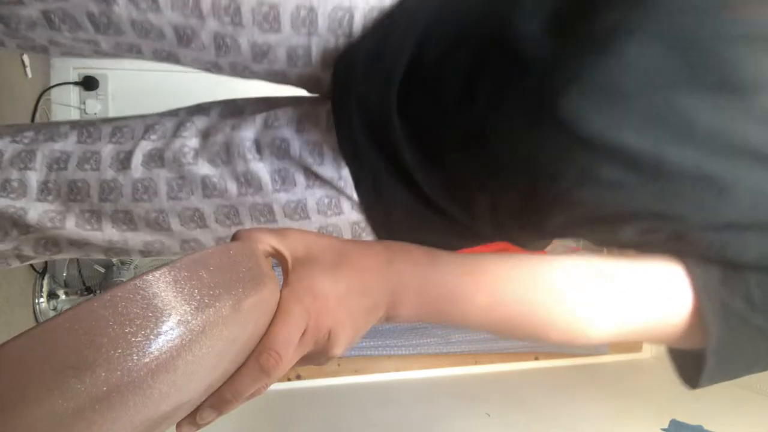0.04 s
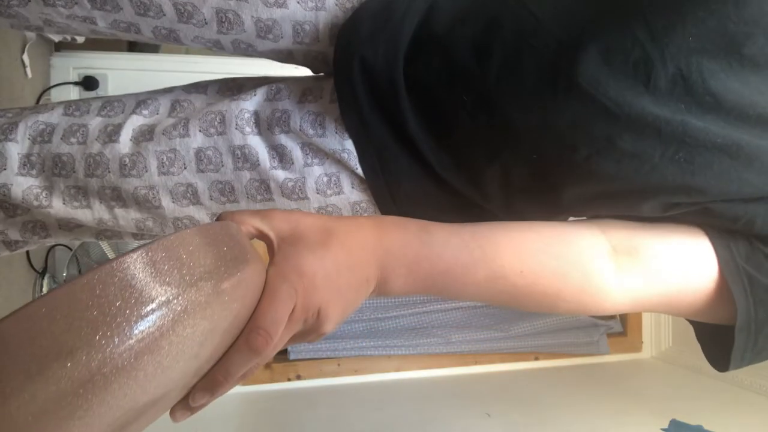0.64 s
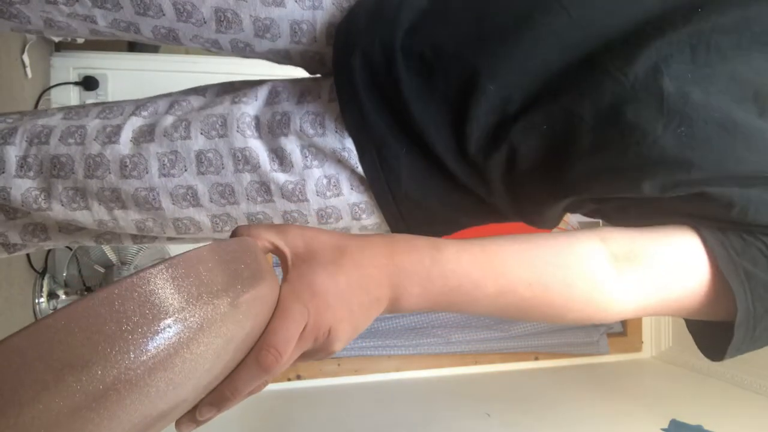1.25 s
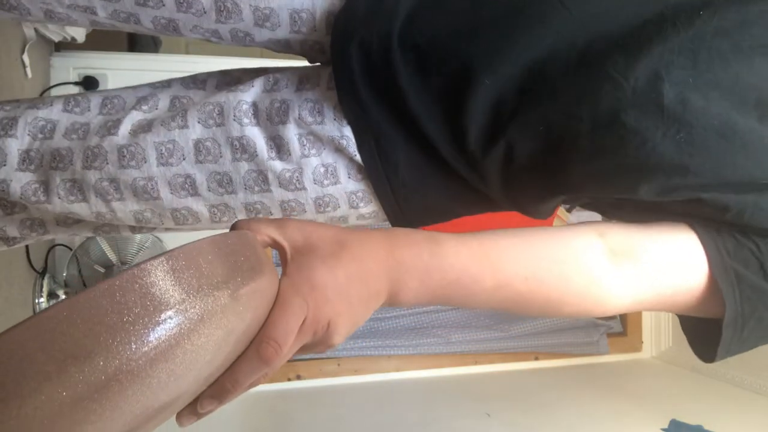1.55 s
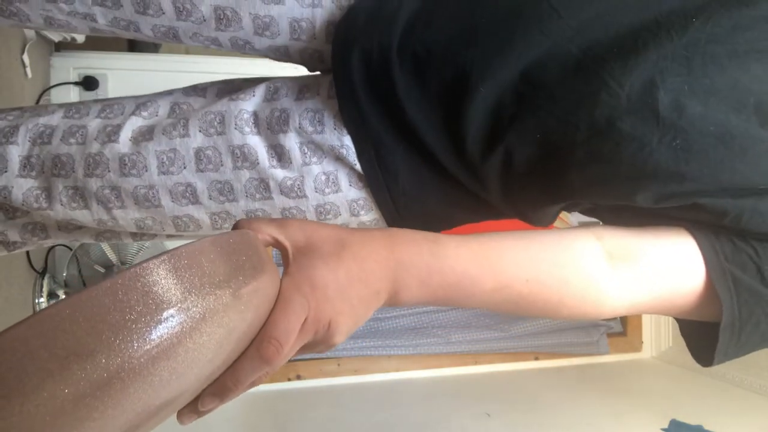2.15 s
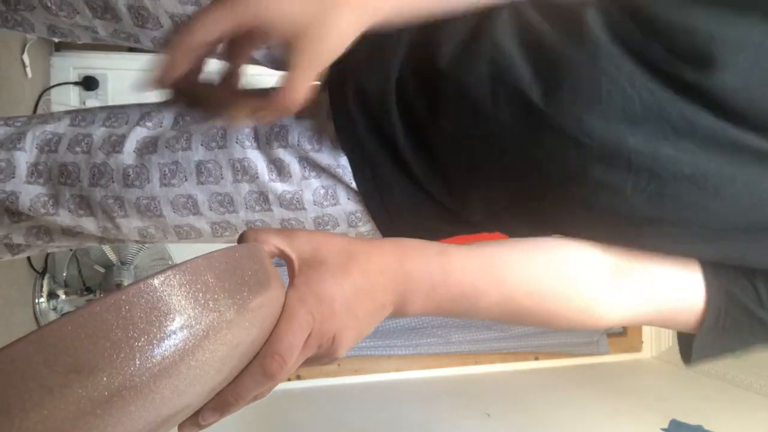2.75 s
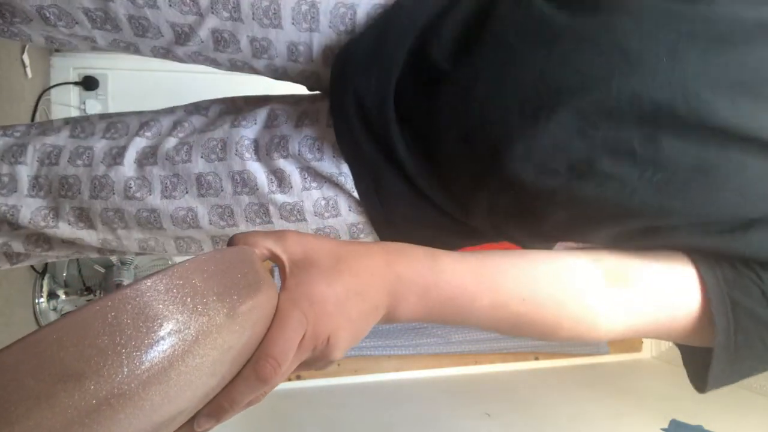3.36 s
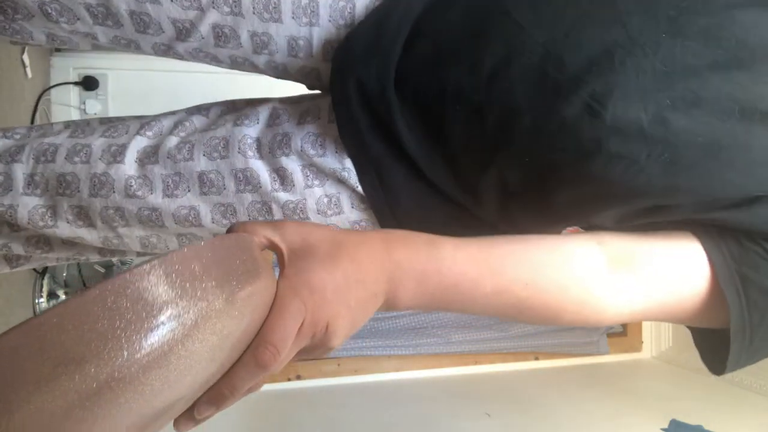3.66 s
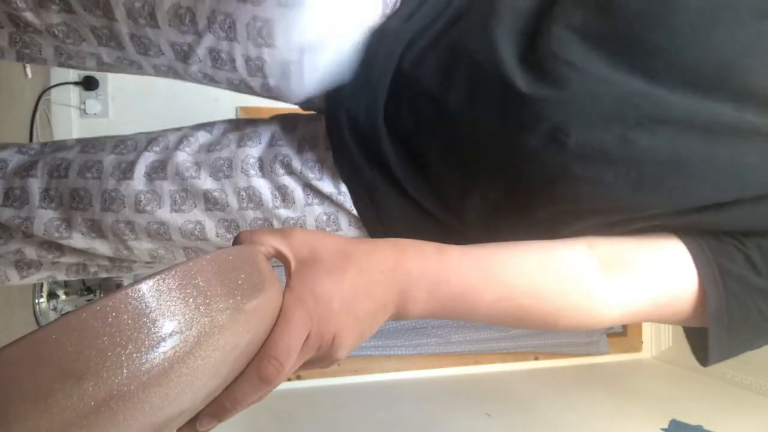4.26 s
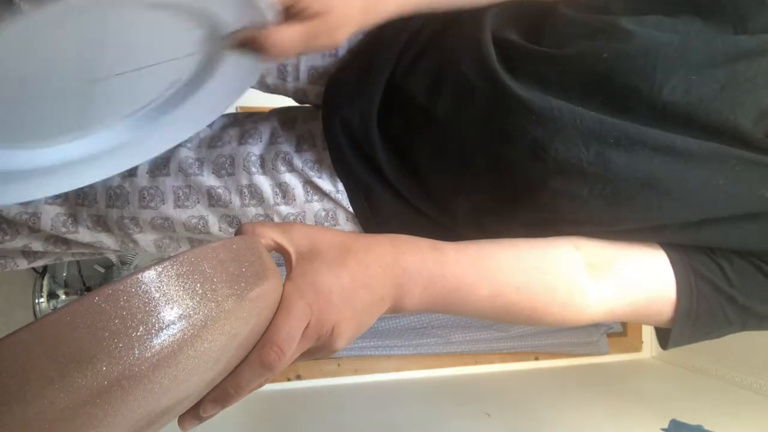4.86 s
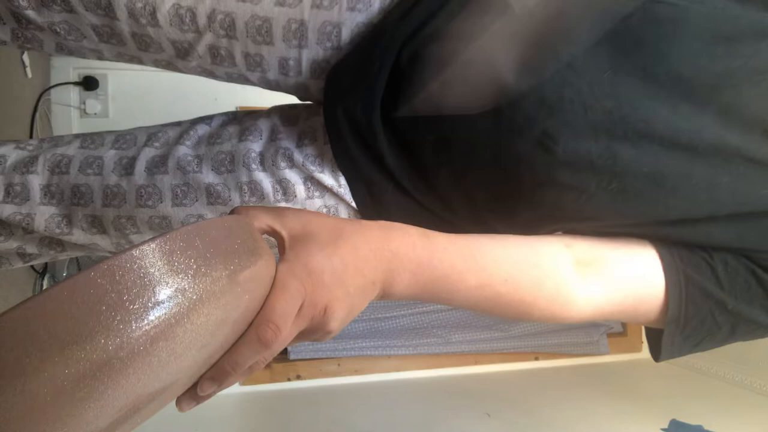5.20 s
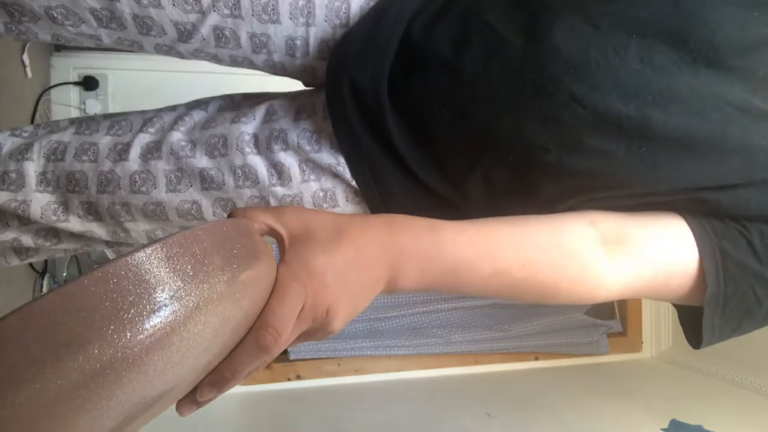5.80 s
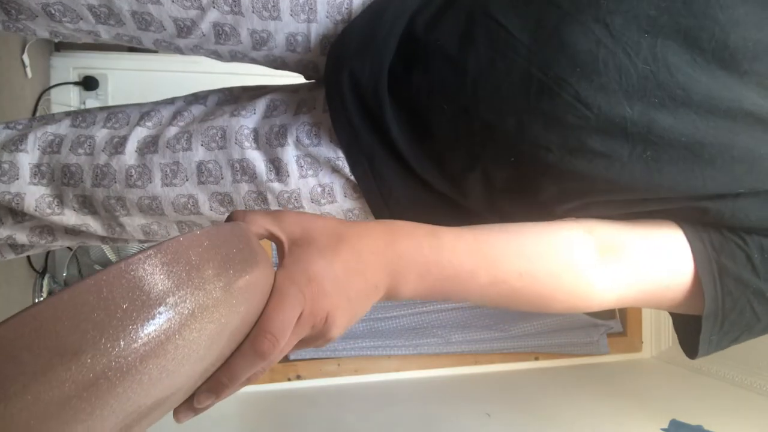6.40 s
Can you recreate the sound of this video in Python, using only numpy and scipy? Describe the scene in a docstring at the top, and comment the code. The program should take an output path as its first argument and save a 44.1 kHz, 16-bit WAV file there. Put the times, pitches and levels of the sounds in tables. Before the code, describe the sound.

Metal knocks with one long ringing clang, followed by handling taps, a dragging scrape and a plastic piece clattering onto metal.

```python
"""Handling a metal fan in a small bedroom

A metal part knocks down four times and is left ringing on one long note with a beating overtone.
Small parts tap, something is dragged with a rough catch-and-slip scrape, and a hollow plastic piece
ticks as it is picked up, then clatters down onto the metal. Each hit is a sharp pulse plus the ring
of the thing struck. Hits and friction get a short room tail; quiet air lies under it all."""
import sys
import numpy as np
from scipy import signal
from scipy.fft import rfft, irfft, next_fast_len
from scipy.io import wavfile

SR = 44100
rng = np.random.default_rng(int(sys.argv[2]) if len(sys.argv) > 2 else 0)


def wav_out(sig):
    """Save sig, one row per channel (or a flat mono array), as 16-bit PCM at SR to the path in sys.argv[1]."""
    wavfile.write(sys.argv[1], SR, np.round(np.clip(np.atleast_2d(sig).T, -1, 1) * 32767).astype(np.int16))


N = 288414
TIME = np.arange(N) / SR
HIT_SAMPLES = 16384

# Levels and gains in the tables are relative: each layer is trimmed again in its function.
# room tone: freq_hz, level_db
AIR_SPECTRUM = [(18, -53), (30, -20.5), (64, -1.5), (221, -3.5), (245, -3), (461, -3.5), (540, -3.5),
                (844, -9), (937, -7), (1540, -10.5), (2120, -16.5), (6550, -21.5), (16000, -32.5)]
# the room's tail, longest in the bass: freq_hz, t60_s
ROOM_DECAY = [(100, 0.9), (400, 0.23), (1500, .2), (5000, 0.14), (14000, .13)]
# the room's standing waves: pitch_hz, width_hz, gain_db
STANDING_WAVES = [(70.4, 2, 3.5), (127, 8, -3.5), (162.8, 6.8, 8.5), (264, 7, 0), (300, 10, 0.5),
                  (373, 3, 4), (603, 24, 0.5)]

# the drag (a hard tug, a light slide, three catches, a long push, settling):
# full_pressure_s, swell_s, hold_s, fade_s, level_db, brightness_db_per_band, rumble_db
DRAG_STROKES = [(2.972, 0.0085, 0.041, 0.24, -33.5, -2.24, 2), (3.05, 0.054, 0.33, .05, -54, -3, 2),
                (3.26, .015, 0.033, 0.015, -36, -7, -11), (3.465, 0.075, 0.01, 0.19, -49, 0.5, 5),
                (3.585, 0.0068, 0.019, 0.093, -32, -9.5, -2),
                (3.735, 0.43, 0.12, 0.055, -34.5, -7.5, -10.5), (3.98, 0.11, 0.031, 0.048, -61, -3, 8.5)]
# smoother rubs, mostly sliding into a hit or rocking after it: same columns
RUB_STROKES = [(0.525, 0.021, .02, .035, -28, -14.5, -3), (0.6, 0.036, 0.14, 0.039, -46, -15.5, -3),
               (0.732, .012, 0.0057, .004, -27, -18.5, -3), (1.15, .3, 0.033, 0.28, -59, -3, 7),
               (2.0, .05, 0.18, 0.62, -70, -3.5, -9), (5.945, .25, 0.0069, .02, -63, -1.5, -7),
               (6.14, 0.011, 0.011, 0.05, -36.5, -9.5, -8), (6.24, 0.093, 0.039, .02, -58, 0, -7),
               (6.297, 0.0076, 0.0089, 0.0035, -26, -10, -17), (6.39, 0.036, .15, .05, -42, -15.5, -18)]
# colour of the friction: freq_hz, level_db
FRICTION_SPECTRUM = [(29, -50.5), (50, -18.5), (138, -13), (180, -2.5), (306, 1), (380, -6), (520, 2),
                     (1330, -11), (1910, -9), (2680, -17.5), (3250, -17.5), (5270, -28), (7570, -26.5),
                     (16000, -46)]
# borders of its rumble, low, mid and high bands: edge_hz
FRICTION_EDGES = [30, 380, 1100, 4200, 17000]
# resonances of the dragged piece: pitch_hz, width_hz, gain_db
DRAG_MODES = [(1430, 40, -3.5), (1680, 40, -2), (1920, 110, 0), (2265, 170, -10), (3180, 170, -13),
              (3470, 69, -12), (4170, 94, -16), (6130, 320, -18)]

# Hit cues, tilted from heavy thud to light rap: start_s, level_db, tilt_db_per_octave, snap_db
TAP_HITS = [(1.201, -48, 0.5, -22), (1.265, -39, -4, -5.5), (1.316, -34, -1, -28.5), (1.41, -64.5, -2, 7),
            (1.491, -41.5, -2, -30), (1.728, -34, -2, -28.5), (1.754, -29, 0.5, -22.5),
            (1.764, -30, 0.5, -24), (1.818, -35, -4.5, -27), (1.875, -54.5, 5, -7.5),
            (2.969, -41, 4.5, 6.5), (3.0, -29, 3, -4.5), (3.013, -38.5, -10, -25), (3.26, -39, 3.5, -16),
            (3.365, -43, 5, -6), (3.461, -41.5, -6.5, -23), (3.581, -34.5, -6, -10), (3.635, -29, 1, -42),
            (3.735, -31, 0.5, -19), (3.862, -35, -2, -34), (4.059, -61, -10, 1), (5.091, -55.5, -7, -13),
            (5.588, -56.5, -4, -3)]  # light bumps while handling
TICK_HITS = [(4.194, -53.5, 1.9, -10), (4.712, -53.5, 6.4, -4), (4.86, -65.5, 2, -3)]  # the plastic piece picked up
CLATTER_HITS = [(5.9598, -20, -1, -16), (5.9922, -23.5, 0.5, -10), (6.012, -35, -2, -7),
                (6.0498, -27, -2, -32), (6.106, -36.5, 3.5, -12), (6.119, -35, -2.5, -15),
                (6.3064, -16.5, 1.3, -12.5), (6.411, -38, -4, -30), (6.5005, -46, 4.5, -22.5)]  # the plastic piece dropping and rocking
KNOCK_HITS = [(0.4988, -15.5, -4, -30), (0.7372, -17.5, 0, -35), (0.787, -18.5, 3.5, -33),
              (0.8178, -19, -0.7, -29)]  # the metal part set down
# bass, mid, bright and snap points of a hit's tone curve: freq_hz
TONE_POINTS = [260, 900, 2300, 6500]
# What each kind of hit radiates: freq_hz, gain_db
TAP_SPECTRUM = [(30, 1.1), (90, 37.2), (200, 33.7), (450, 45.6), (1100, 38.4), (1900, 41.6), (3000, 34.7),
                (7000, 32.5), (15000, 10.7)]
CLATTER_SPECTRUM = [(30, 5), (75, 31), (200, 28), (320, 44), (850, 41.6), (1250, 34.7), (1800, 39.5),
                    (2900, 32.9), (4500, 35.2), (8500, 31.6), (15000, 14)]
KNOCK_SPECTRUM = [(30, -2.5), (75, 30), (200, 34), (300, 42), (500, 42), (1000, 46), (2000, 40), (3000, 33),
                  (4200, 31), (7000, 28.5), (15000, 14.5)]
# Resonances the hits excite: pitch_hz, width_hz, gain_db
HOLLOW_PLASTIC_MODES = [(850.7, 11, 7), (964, 18, 0.5), (1664, 92, 4.5), (1930, 56, 7), (2113, 1.6, 10.5),
                        (2430, 22, 3), (2473, 8.3, 0.5), (3544, 75, 6.5), (4220, 30, -14), (4883, 56, 4),
                        (7380, 230, -1)]
HELD_PLASTIC_MODES = [(1110, 69, -3), (1500, 77, 0.5), (2500, 84, 4), (3040, 117, 3), (3300, 60, -4),
                      (3820, 280, 1.5), (4100, 180, -1)]
SURFACE_MODES = [(536, 17, 2.5), (854, 18, 5.5), (1247, 66, -3.5), (1370, 41, -1), (1900, 16, 1.5),
                 (3460, 44, 6.5)]  # the surface under the metal

# hits that set the metal ringing: start_s, level_db, tilt_db_per_octave, damping_db_per_s
RING_HITS = [(0.499, -19.5, 4.3, 45), (0.738, -6.5, 1, 230), (0.787, 0, 0.5, 1), (5.959, -19.5, -1, 7),
             (6.3062, -18.5, -11, 18)]
# the metal's long note, a quick and a slow decay at one pitch: level_db, t60_s
NOTE_DECAYS = [(-29, 0.9), (-27, 4.15)]
NOTE_HZ, OVERTONE_HZ, BEAT_HZ = 940.7, 2088, 5.6
# the metal's other modes: pitch_hz, level_db, t60_s
METAL_PARTIALS = [(353, -28, 0.46), (604.4, -21, .3), (858, -17, .33), (890, -35.5, 1.4), (983, -34.5, 1.5),
                  (1010, -35.5, 1.8), (1043, -33.5, 1.1), (1067, -37.5, .6), (1190, -28, .25),
                  (1884, -45.5, 0.42), (3620, -55.5, .35), (5432, -37.5, 0.17), (7980, -47, .3),
                  (9720, -57, 0.18), (10430, -55, 0.26), (10910, -55, .22), (12800, -55, .2)]


def from_db(db):
    """Decibels to gain."""
    return 10 ** (np.asarray(db) / 20)


def rms_one(x):
    """Scale to rms 1."""
    return x / np.sqrt(np.mean(x ** 2) + 1e-20)


def at_hz(points, hz):
    """Read a (freq_hz, value) table on a log-frequency axis."""
    knots, values = np.transpose(points)
    return np.interp(np.log(np.maximum(hz, 1)), np.log(knots), values)


def bins(size):
    """Frequencies of a real FFT."""
    return np.arange(size // 2 + 1) * SR / size


def add(track, start_s, sound):
    """Mix a sound in on its cue."""
    start = round(start_s * SR)
    track[start:start + len(sound)] += sound[:N - start]


def coloured(x, spectrum):
    """EQ a signal with a spectrum table; rms 1."""
    size = next_fast_len(N)
    return rms_one(irfft(rfft(x, size) * from_db(at_hz(spectrum, bins(size))), size)[:N])


def drift(rate_hz):
    """A random wobble with a spread near 1."""
    return np.interp(TIME * rate_hz, np.arange(N // 20), rng.standard_normal(N // 20))


def resonate(x, modes):
    """Parallel resonances driven by a signal."""
    out = 0
    for hz, width_hz, db in modes:
        radius = np.exp(-np.pi * width_hz / SR)
        poles = [1, -2 * radius * np.cos(2 * np.pi * hz / SR), radius ** 2]
        out += from_db(db) * (1 - radius ** 2) / 2 * signal.lfilter([1, 0, -1], poles, x + 1e-18)
    return out


def dense_ring(t60_table, onset_s):
    """Countless overlapping modes: white noise that dies away band by band."""
    t, hz, out = TIME[:HIT_SAMPLES], bins(HIT_SAMPLES), 0
    white = rfft(rng.standard_normal(HIT_SAMPLES))
    attack = 1 - np.exp(-(t / onset_s) ** 2)
    edges = np.r_[0, np.geomspace(150, SR / 2, 13)]
    for low, high in zip(edges, edges[1:]):
        band = irfft(white * ((hz >= low) & (hz < high)))
        decay = from_db(-60 * t / at_hz(t60_table, (low + high) / 2))
        share = np.sqrt(2 * (high - low) / SR / HIT_SAMPLES)  # even energy per Hz
        out += rms_one(band * attack * decay) * share
    return out


def minimum_phase(gain):
    """Turn a gain curve into the spectrum of a pulse with nothing ahead of its attack."""
    cepstrum = irfft(np.log(gain))
    fold = np.r_[1, np.full(HIT_SAMPLES // 2 - 1, 2), np.zeros(HIT_SAMPLES // 2)]
    return np.exp(rfft(cepstrum * fold))


def room_air():
    """A bed of soft, dark noise whose level wavers slightly."""
    return from_db(-64) * coloured(rng.standard_normal(N), AIR_SPECTRUM) * from_db(0.78 * drift(19))


def bedroom(x, wet_db, modes_db):
    """Near walls and soft furnishings add a short tail and a few low standing waves."""
    # the hits and friction carry no deep bass
    x = signal.sosfilt(signal.butter(3, 62, "high", fs=SR, output="sos"), x)
    tail = signal.fftconvolve(x, dense_ring(ROOM_DECAY, onset_s=0.0072))[:N]
    return x + from_db(wet_db) * tail + from_db(modes_db) * resonate(x, STANDING_WAVES)


def squeaks(per_s, width_hz, count):
    """Edges stick and ring briefly, each at a high pitch of its own."""
    slips = rng.standard_normal(N) * (rng.random(N) < per_s / SR)
    edge = rng.integers(0, count, N)
    return rms_one(sum(resonate(slips * (edge == k), [(hz, width_hz, 0)])
                       for k, hz in enumerate(np.geomspace(1500, 11000, count))))


def pressure(full_s, swell_s, hold_s, fade_s):
    """A stroke rises 20 dB per swell_s, holds at 1, then falls 20 dB per fade_s."""
    away = np.maximum((full_s - TIME) / swell_s, (TIME - full_s - hold_s) / fade_s)
    return from_db(-20 * np.clip(away, 0, 10))


def friction(strokes, grains_per_s, spread_db, judder_db, flicker_db, ring_db, squeak_db, bands_db):
    """Surfaces catch and slip in clumps of tiny grains; pressure drives four bands together."""
    sizes = from_db(spread_db * np.minimum(rng.exponential(1, N), 4)) * rng.choice([-1, 1], N)
    slips = rng.random(N) < grains_per_s / SR
    grains = rms_one(sizes * slips * from_db(judder_db * drift(110)))
    grit = grains + from_db(ring_db) * resonate(grains, DRAG_MODES)
    grit += from_db(squeak_db) * squeaks(per_s=1500, width_hz=90, count=36)
    texture = coloured(grit, FRICTION_SPECTRUM)
    power, out = 0, 0
    for *timing, level_db, bright_db, rumble_db in strokes:
        gains = from_db(level_db + np.array([rumble_db, 0, bright_db, 2 * bright_db]))
        power += np.outer(gains, pressure(*timing)) ** 2
    for k, edges in enumerate(zip(FRICTION_EDGES, FRICTION_EDGES[1:])):
        band = signal.sosfilt(signal.butter(4, edges, "band", fs=SR, output="sos"), texture)
        band = rms_one(band * from_db(flicker_db * drift(70)))
        out += band * np.sqrt(power[k]) * from_db(bands_db[k])
    return out


def soft_rubs():
    """Dense, even grains blur into a smooth slide."""
    return friction(RUB_STROKES, grains_per_s=20000, spread_db=1, judder_db=2, flicker_db=1,
                    ring_db=-4, squeak_db=-11, bands_db=[-2.9, -2.4, -1.5, -1.5])


def rough_drag():
    """Coarse, juddering grains make the dragged piece ring."""
    return friction(DRAG_STROKES, grains_per_s=5000, spread_db=2, judder_db=5, flicker_db=1.26,
                    ring_db=10, squeak_db=-4.5, bands_db=[-4.5, -2.94, -4, 0])


def impacts(cues, spectrum, middle_db, body_t60_s, body_db, lag_s, edge_hz):
    """Each contact is a sharp pulse, followed by the short dense ring of the thing struck."""
    out, hz = np.zeros(N), bins(HIT_SAMPLES)
    # bending waves carry the treble first; lag_s is the delay at 1 kHz
    bending = np.exp(-4j * np.pi * lag_s * np.sqrt(hz * 1000))
    direct = bending / (1 + 1j * hz / edge_hz)
    octaves = np.log2(np.divide(TONE_POINTS, TONE_POINTS[1]))
    for start_s, level_db, tilt_db, snap_db in cues:
        # bass and treble see-saw about the middle, which stands out by middle_db
        bass_db, _, bright_db, _ = tilt_db * octaves - middle_db
        tone = list(zip(TONE_POINTS, [bass_db, 0, bright_db, snap_db]))
        pulse = minimum_phase(from_db(level_db + at_hz(tone, hz) + at_hz(spectrum, hz)))
        body = from_db(body_db) * rfft(dense_ring([(1, body_t60_s)], onset_s=0.0015))
        add(out, start_s, irfft(pulse * (direct + body)))
    return out


def handling_taps():
    """Small parts bump: soft-edged hits with a hint of hollow plastic."""
    hits = impacts(TAP_HITS, TAP_SPECTRUM, middle_db=3.5, body_t60_s=0.066, body_db=4.5,
                   lag_s=0.000816, edge_hz=2100)
    return from_db(-7.5) * hits + from_db(-10) * resonate(hits, HOLLOW_PLASTIC_MODES)


def plastic_ticks():
    """The plastic piece is picked up: tiny clicks that die quickly in the hand."""
    hits = impacts(TICK_HITS, TAP_SPECTRUM, middle_db=7.5, body_t60_s=0.01, body_db=5.5,
                   lag_s=0.000675, edge_hz=4800)
    return from_db(-9.5) * hits + from_db(2) * resonate(hits, HELD_PLASTIC_MODES)


def plastic_clatter():
    """The plastic piece drops onto the metal and rocks: crisp hits ring its hollow shell."""
    hits = impacts(CLATTER_HITS, CLATTER_SPECTRUM, middle_db=4, body_t60_s=0.032, body_db=5,
                   lag_s=0.001178, edge_hz=27000)
    return from_db(-3) * hits + from_db(-5) * resonate(hits, HOLLOW_PLASTIC_MODES)


def metal_knocks():
    """The metal part is set down: hard hits sound the surface beneath it."""
    hits = impacts(KNOCK_HITS, KNOCK_SPECTRUM, middle_db=5.5, body_t60_s=0.058, body_db=1.5,
                   lag_s=0.0012, edge_hz=19000)
    return from_db(-1) * hits + from_db(-4) * resonate(hits, SURFACE_MODES)


def metal_ring(overtone_db, overtone_t60_s, twin_share):
    """The metal rings on after the harder hits, unless a hand or another object damps it."""
    out = np.zeros(N)
    modes = METAL_PARTIALS + [(NOTE_HZ, db, t60_s) for db, t60_s in NOTE_DECAYS]
    for start_s, level_db, tilt_db, damping_db_per_s in RING_HITS:
        t, ring = TIME[:N // 2], 0
        for hz, db, t60_s in modes:
            envelope = from_db(db + tilt_db * np.log2(hz / NOTE_HZ) - 60 * t / t60_s)
            ring += envelope * np.sin(2 * np.pi * hz * t)
        # the rim is not quite round, so its overtone splits into a beating pair
        twin = twin_share * np.sin(2 * np.pi * (OVERTONE_HZ + BEAT_HZ) * t)
        pair = np.sin(2 * np.pi * OVERTONE_HZ * t) - twin
        ring += from_db(overtone_db - 60 * t / overtone_t60_s) * pair
        add(out, start_s, from_db(level_db - damping_db_per_s * t) * ring)
    return out


def scene():
    """Mono mix: hits and friction go through the room; the metal's ring and the air stay dry."""
    handling = metal_knocks() + plastic_clatter() + handling_taps() + plastic_ticks()
    handling += rough_drag() + soft_rubs()
    ring = metal_ring(overtone_db=-36, overtone_t60_s=1, twin_share=0.97)
    return (bedroom(handling, wet_db=-6.5, modes_db=1) + ring + room_air())[None]


def record(dry):
    """Soft-clip the loudest peaks, then cut the deepest bass and the very top."""
    rounded = dry / (1 + (dry / 0.88) ** 4) ** 0.25
    thinned = signal.sosfilt(signal.butter(3, 45, "high", fs=SR, output="sos"), rounded)
    return signal.sosfilt(signal.ellip(10, 0.1, 80, 16000, fs=SR, output="sos"), thinned)


dry = scene()
out = record(dry)
wav_out(out)
```